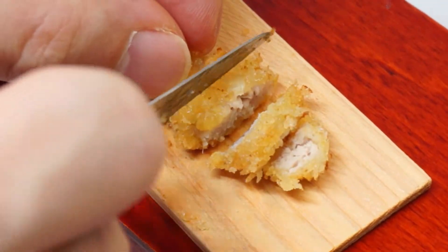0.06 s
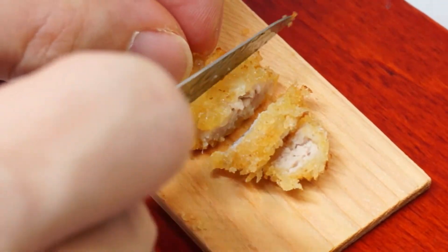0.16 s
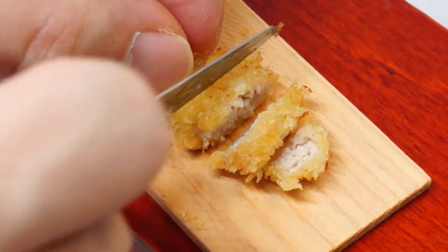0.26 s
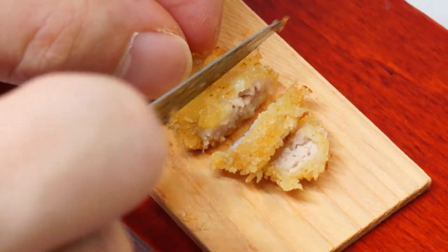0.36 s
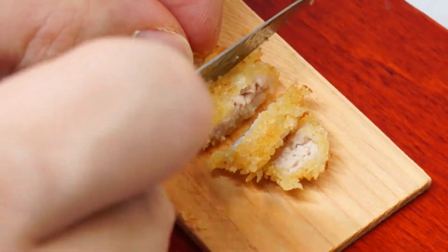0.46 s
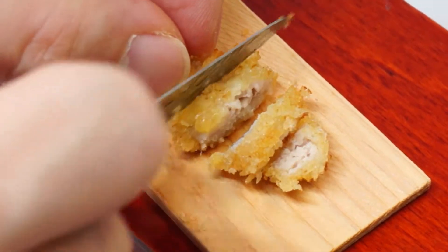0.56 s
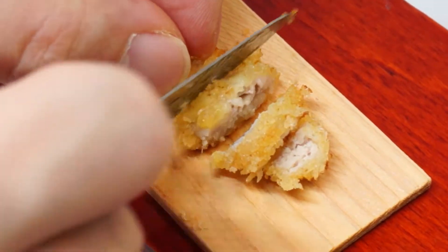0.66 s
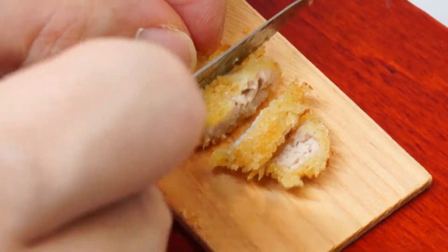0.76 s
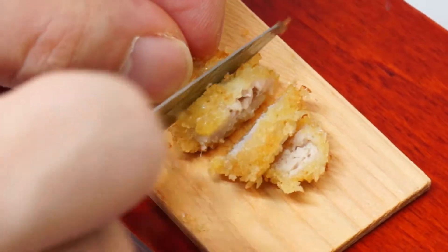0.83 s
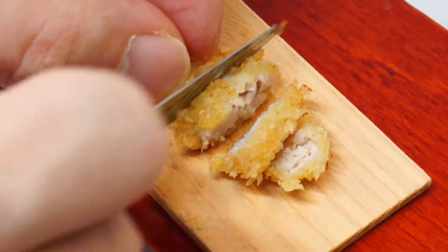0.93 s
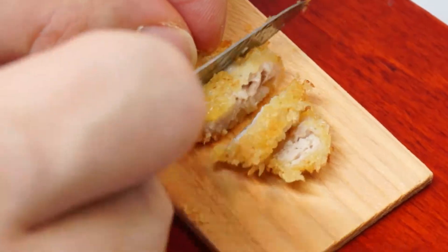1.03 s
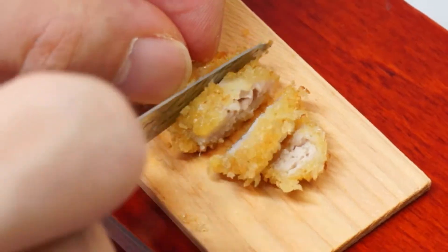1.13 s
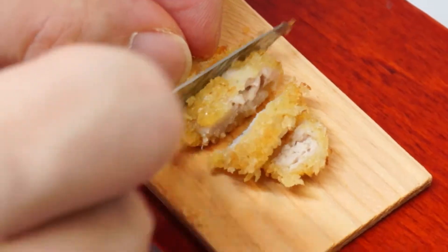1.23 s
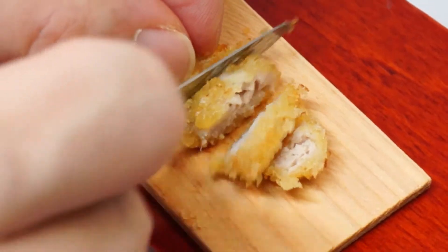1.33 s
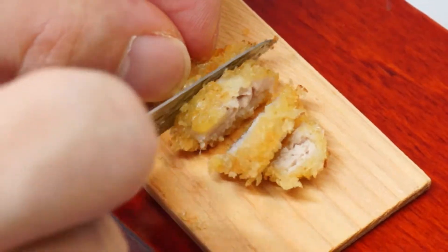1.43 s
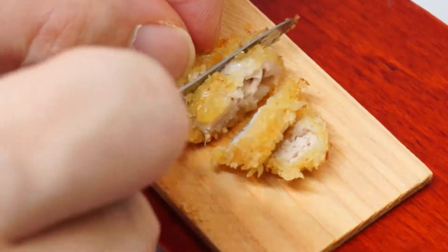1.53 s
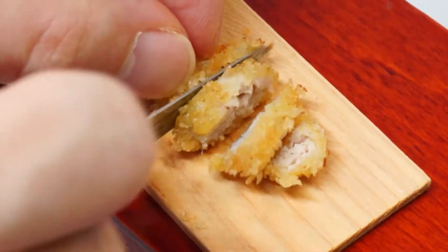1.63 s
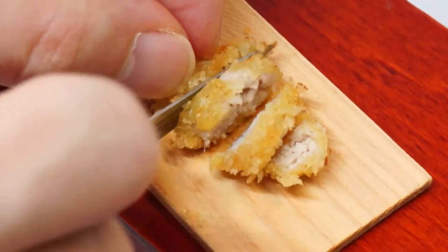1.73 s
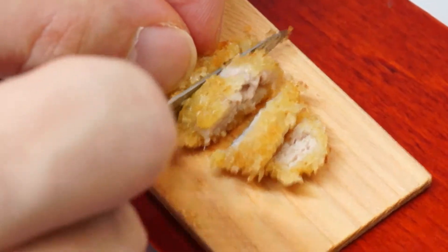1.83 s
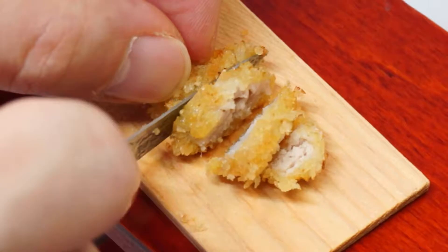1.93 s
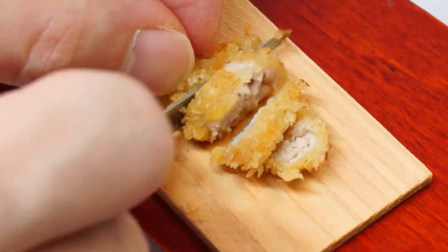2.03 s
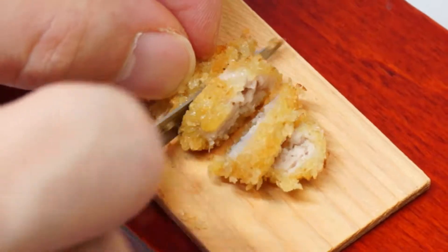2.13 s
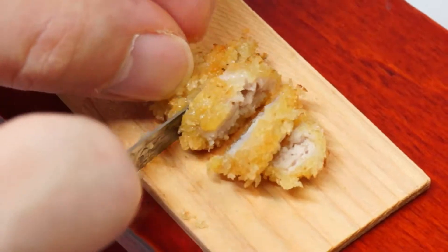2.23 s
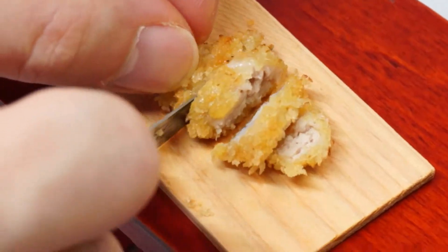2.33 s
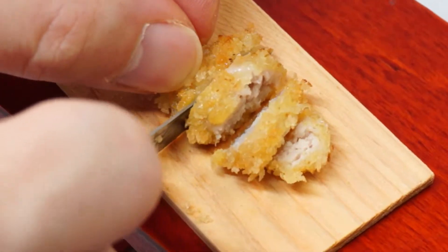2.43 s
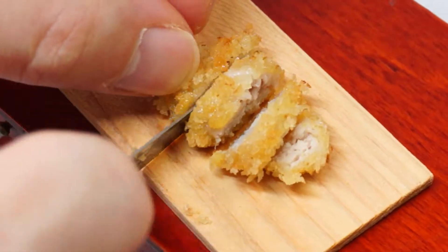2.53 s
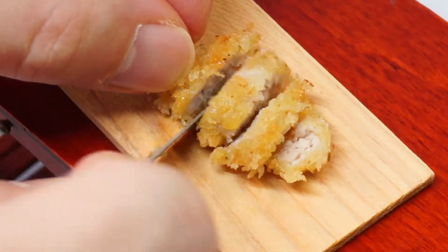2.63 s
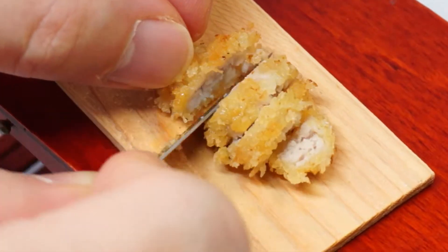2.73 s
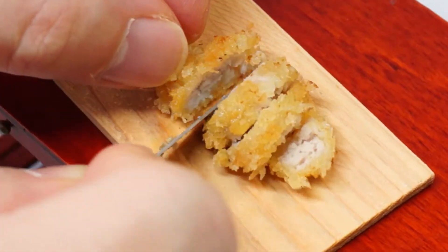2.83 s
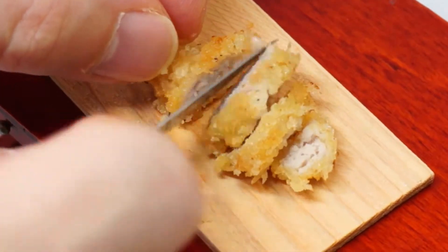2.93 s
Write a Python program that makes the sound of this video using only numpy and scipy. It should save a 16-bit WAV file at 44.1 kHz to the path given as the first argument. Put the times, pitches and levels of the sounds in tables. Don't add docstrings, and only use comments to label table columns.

```python
import sys
import numpy as np
from scipy import signal
from scipy.fft import rfft, irfft
from scipy.io import wavfile
from scipy.ndimage import uniform_filter1d

SR = 44100
rng = np.random.default_rng(int(sys.argv[2]) if len(sys.argv) > 2 else 0)


def generate_wav(sig):
    pcm = np.round(np.clip(np.atleast_2d(sig).T, -1, 1) * 32767).astype(np.int16)
    wavfile.write(sys.argv[1], SR, pcm)


def boost_factor(decibels):
    exponent = np.asarray(decibels, float) / 20
    return 10 ** exponent


N = 132300

# [t/s, peak level/dB, blade ring level/dB re crack]
CRACKS = [(0.084, -27, -30), (0.0917, -29, -23), (0.2537, -28.5, -10), (0.2994, -16.5, -43),
          (0.4094, -29.5, -17), (0.417, -32, -26), (0.4238, -24, -3), (0.4479, -28, -14),
          (0.457, -33, -20), (0.5207, -23.5, -20), (0.527, -21, -19), (0.535, -17, -34),
          (0.559, -29, -12), (0.623, -34, -14), (0.681, -24, -15), (0.6908, -20.5, -20.5),
          (0.715, -27.5, -19), (.768, -34, -20), (0.7795, -19.5, -16.5), (0.819, -19.5, -4.5),
          (0.8939, -33.5, 1.5), (1.0584, -35, -18), (1.0794, -23, -22), (1.0894, -25.5, -7.5),
          (1.122, -27, -20), (1.1613, -23, -12), (1.168, -26, -14), (1.1822, -19.5, -10),
          (1.2462, -31.5, -12), (1.258, -24, -10.5), (1.2655, -43.5, 8),
          (1.3937, -8.5, -14.5), (1.4014, -40, -18), (1.4198, -36.5, 7), (1.491, -29, -14),
              (1.5959, -27, -19), (1.6172, -18.5, -11), (1.6414, -17.5, -18), (1.649, -17.5, -32),
              (1.7, -27, -36), (1.9592, -29.5, -15), (2.0315, -25.5, -22), (2.087, -21, -37),
              (2.1476, -15, -24), (2.165, -24, -10), (2.1707, -22, -19), (2.1812, -24, -12),
              (2.2112, -13.5, -13), (2.2191, -11, -15), (2.2533, -29, -28), (2.2732, -18, -9),
              (2.2881, -18.5, -9), (2.2944, -24, -8), (2.3054, -14.5, -4.5), (2.324, -22.5, -22),
              (2.4126, -23.5, -12.5), (2.4613, -43, -23), (2.7056, -25, -17), (2.7358, -25.5, -11.5),
              (2.7433, -24.5, -11.5), (2.9381, -27, -13),
          (0.0395, -38, -28), (0.145, -40, -21), (.1989, -37, -25), (0.2144, -34, -23),
                (0.753, -32, -18), (.7615, -41, -1), (0.8282, -25.5, -33), (.8869, -31, -17),
                (.9018, -30, -16), (1.047, -41, -6), (1.509, -33, -19), (1.532, -45, -18),
                (1.551, -34.5, -24), (1.5748, -31, -21), (1.7365, -35, -21), (1.838, -37, -18),
                (1.8657, -40.5, -14), (1.942, -37, -12), (2.0068, -33, -16), (2.124, -27, -14),
                (2.1373, -29, -17), (2.1436, -19.5, -17), (2.296, -30.5, -4), (2.315, -24, -18),
                (2.45, -34, -18), (2.5428, -33, -15.5), (2.763, -32, -22), (2.779, -36, -13),
                (2.803, -33.5, -22), (2.9033, -39, -18), (2.9605, -35, -15)]
# [start t/s, length t/s, level/dB]
STROKES = [(0.068, 0.026, -94), (0.2, 0.075, -64), (0.429, 0.13, -58.5), (0.516, 0.064, -57.5),
           (0.682, 0.018, -55.5), (0.762, 0.038, -51), (0.884, 0.066, -63), (1.04, 0.076, -56),
           (1.167, 0.14, -58), (1.338, 0.074, -53), (1.398, 0.066, -56), (1.463, 0.12, -63.5),
           (1.587, 0.069, -55), (1.687, 0.052, -60.5), (1.844, 0.089, -63), (2.069, 0.078, -55),
           (2.126, 0.042, -49.5), (2.23, 0.078, -55.5), (2.255, 0.044, -54), (2.372, 0.16, -60),
           (2.7, 0.061, -54)]
# [f/Hz, level/dB, t60/s]
CRUST_MODES = [(6220, -13, 0.0011), (8330, -7, 0.0023), (9360, -2, 0.0019), (11630, 4.5, 0.0012),
               (13300, 4.5, 0.0012), (14600, 0.5, 0.0031)]
# [f/Hz, level/dB, t60/s]
BLADE_MODES = [(1712, -16.5, 0.044), (2296, -7.5, 0.0072), (2884, -2, 0.0069), (3467, -1.5, 0.013),
               (3920, 0.5, 0.0066), (4473, 0.5, 0.0096), (5730, 1.5, 0.0038)]
# [middle t/s, half length t/s, level/dB]
DRAGS = [
    (0.42, 0.0059, -61),
    (0.819, 0.0076, -54.5),
    (0.898, 0.0078, -53.5),
    (1.182, 0.0062, -55),
    (2.182, .012, -56),
    (2.602, .04, -61.5),
]
# [t/s, peak level/dB]
KNOCKS = [
    (1.103, -23),
    (1.373, -21),
    (1.609, -20.5),
    (1.895, -24),
    (2.154, -27),
    (2.396, -21),
]
# [t/s, level/dB, contact t/ms]
THUMPS = [(0.092, -33.5, 4.6), (.139, -45, 2.2), (0.214, -35, 3), (0.357, -47, 3.6), (0.393, -45, 3),
          (0.434, -35.5, 3.7), (.54, -34, 3.5), (0.791, -31, 3.7), (0.82, -26.5, 3.5), (0.9, -27, 2.4),
          (1.058, -36, 2.7), (1.089, -27, 3.2), (1.126, -47, 1.5), (1.14, -30, 1.3), (1.152, -30, 2),
          (1.179, -22, 2.6), (1.191, -40, 3), (1.4, -24, 5.2), (1.415, -28.5, 2.4), (1.448, -18.5, 3.75),
          (1.636, -33, 3), (1.669, -26.5, 2.9), (1.699, -22, 2.5), (1.941, -27.5, 3.6), (1.966, -22.5, 2.9),
          (2.064, -28, 1.95), (2.203, -30, 3.2), (2.226, -20.5, 3.6), (2.31, -23, 3.9), (2.41, -28.5, 2.56),
          (2.423, -27, 3.1), (2.436, -27, 3.6), (2.551, -31.5, 2.8), (2.622, -31.5, 5.9), (2.702, -36, 3.1),
          (2.778, -34, 3.6), (2.941, -37.5, 0.55)]
# [f/Hz, level/dB, t60/s]
BOARD_MODES = [(137.6, -2, 0.098), (204, -2, 0.035), (304, -6, 0.031), (395, -6.5, 0.049),
               (480.6, -7, 0.04), (555.8, -12, 0.13), (750, -11, 0.053), (873, -7, 0.029),
               (989, -11.5, 0.013), (1160, -11.5, 0.015), (1390, -13.5, 0.017), (1517, -15, 0.018),
               (1760, -11.5, 0.014), (2840, -19.5, 0.011), (3670, -11, 0.017)]
# [f/Hz, width f/Hz]
BOARD_GAPS = [(655, 108), (1950, 170)]
# [f/Hz, width f/Hz, level/dB]
WHINES = [(53, 14, -74), (143.6, 55, -57), (214.6, 15, -66.5), (302.4, 41, -57.5), (416, 21, -84),
          (1660, 27, -72), (3460, 160, -74), (3690, 27, -73.5), (5330, 53, -79.5)]
# [f/Hz, level/dB per Hz]
FLOOR_COLOUR = [(28, -19.5), (55, -1), (80, -12.5), (200, -8), (500, -11.5), (1000, -25), (2100, -33.5),
                (12000, -35.5)]
# [f/Hz, level/dB]
SIDE_COLOUR = [(30, -27), (80, -19), (150, -15.5), (300, -10.5), (700, -3.5), (1500, -3.5), (3000, -4),
               (6000, -11), (9000, -19.5), (12000, -23)]


def impulses(times, dbs):
    x = np.zeros(N)
    np.add.at(x, np.clip((np.asarray(times) * SR).astype(int), 0, N - 1), boost_factor(np.asarray(dbs)))
    return x


def ring(x, modes, flip=1):
    out = 0
    for k, (hz, db, t60) in enumerate(modes):
        pole = np.exp(2j * np.pi * hz / SR - np.log(1000) / (t60 * SR))
        out = out + flip ** k * boost_factor(db) * signal.lfilter([1], [1, -pole], x).imag
    return out


def shaped(points, x):
    f = np.fft.rfftfreq(N, 1 / SR) + 1
    hz, db = np.array(points, float).T
    return irfft(rfft(x) * boost_factor(np.interp(np.log(f), np.log(hz), db)), N)


def at_level(x, db):
    return x * boost_factor(db) / np.sqrt(np.mean(x ** 2))


def walk(rate):
    k = int(SR / rate)
    steps = np.repeat(rng.standard_normal(N // k + 1), k)
    return 1.11 * uniform_filter1d(uniform_filter1d(steps, k), k)[:N]


def push(start_s, db, ms):
    u = (np.arange(N) / SR - start_s) / (ms / 1000)
    shape = np.where((u > 0) & (u < 1), np.sin(np.pi * u) ** 2, 0)
    return boost_factor(db) * shape / max(shape.sum(), 1e-9)


def decay(x, s):
    return signal.lfilter([1], [1, -np.exp(-1 / (s * SR))], x)


def cracks():
    snap_db, snap_lag_s, blade_db = 1.5, 0.001, 2.5
    tail_db, tail_s = -20.5, 0.0018
    rubble_db, rubble_s = -33, 0.013
    times, peak_db, ring_db = np.array(CRACKS).T
    ragged = rng.standard_normal((2, N)) * boost_factor(2.85 * rng.standard_normal((2, N)))
    rubble_gain = boost_factor(rubble_db + 4.9 * walk(400))

    def burst(db, noise):
        snap = impulses(times + snap_lag_s, db + snap_db)
        tail = boost_factor(tail_db) * decay(snap, tail_s)
        rubble = rubble_gain * decay(snap, rubble_s)
        return snap + noise * (tail + rubble)

    crust = ring(burst(peak_db, ragged[0]), CRUST_MODES, flip=-0.71)
    blade = ring(burst(peak_db + ring_db + blade_db, ragged[1]), BLADE_MODES, flip=-0.94)
    return 0.65 * crust + 0.23 * blade


def crumbs():
    breaks_per_s, spread_db = 1600, 3.6
    attack_s, fade_s = 0.0072, 0.032
    t = np.arange(N) / SR
    effort = 0
    for start, length, db in STROKES:
        fade = np.exp(-np.clip(t - start - length, 0, 1) / fade_s)
        effort = effort + boost_factor(db) * np.clip((t - start) / attack_s, 0, 1) * fade
    chance, size, sign = rng.random((3, N))
    grains = (chance < breaks_per_s / SR) * boost_factor(-spread_db * np.log(size + 1e-4)) * np.sign(sign - 0.5)
    dust = 0.13 * rng.standard_normal(N) * decay(np.abs(grains), 0.0028)
    return at_level(grains + dust, 0) * effort * boost_factor(4.0 * walk(60))


def drag():
    t = np.arange(N) / SR
    swell = sum(boost_factor(db) * np.exp(-0.5 * ((t - s) / d) ** 2) for s, d, db in DRAGS)
    friction = rng.standard_normal(N) * boost_factor(7.5 * walk(300))
    return swell * at_level(ring(friction, BLADE_MODES[2:6], flip=-0.84), 0)


def board(bits):
    tick_db, tick_lag_s, tick_ms = -0.5, 0.00125, 0.25
    knock_db, knock_lag_s, knock_ms = 5, 0.00285, 1.36
    scuff_db, scuff_s = -41, 0.031
    crumb_push_db, low_cut_hz = -18.5, 150
    thump_s, thump_db, _ = np.array(THUMPS).T
    stiff_modes = [mode for mode in BOARD_MODES if mode[0] > 700]

    tick = sum(push(s + tick_lag_s, db + tick_db, tick_ms) for s, db in KNOCKS)
    scuff_swell = uniform_filter1d(decay(impulses(thump_s, thump_db), scuff_s), size=400)
    scuff = boost_factor(scuff_db) * rng.standard_normal(N) * scuff_swell

    knock = sum(push(s + knock_lag_s, db + knock_db, knock_ms) for s, db in KNOCKS)
    rocking = sum(push(*row) for row in THUMPS)
    shaking = boost_factor(crumb_push_db) * uniform_filter1d(bits, size=30)

    body = ring(knock + rocking + shaking, BOARD_MODES)
    body = body + ring(tick + uniform_filter1d(scuff, size=10), stiff_modes)
    for hz, width_hz in BOARD_GAPS:
        body = signal.lfilter(*signal.iirnotch(hz, hz / width_hz, fs=SR), body)
    return signal.sosfilt(signal.butter(4, low_cut_hz, "high", fs=SR, output="sos"), body)


def rub():
    middle_s, length_s, level_db = 0.95, 0.022, -55
    skin = [(12100, 0, 0.0006)]  # f/Hz, level/dB, t60/s
    swell = np.exp(-0.5 * ((np.arange(N) / SR - middle_s) / length_s) ** 2)
    hiss = ring(ring(rng.standard_normal(N), skin), skin)
    return swell * at_level(hiss, level_db)


def room_tail(dry):
    level_db, t60_s, dull_hz = -5, 0.32, 2550
    t = np.arange(SR // 2) / SR
    tails = rng.standard_normal((2, len(t))) * boost_factor(-60 * t / t60_s) * (t > 0.003)
    tails = tails / np.sqrt((tails ** 2).sum(1, keepdims=True))
    tails = signal.lfilter(*signal.butter(1, dull_hz, fs=SR), tails)
    return boost_factor(level_db) * signal.fftconvolve(dry[None], tails, axes=1)[:, :N]


def room_tone():
    hum_hz, hum_db, wobble_db, floor_db = 441.1, -46, 0.56, -51
    hum_phase = 2 * np.pi * np.cumsum(hum_hz + 0.53 * walk(5.94)) / SR
    hum = np.sqrt(2) * boost_factor(hum_db + wobble_db * walk(8.7)) * np.sin(hum_phase)
    f = np.fft.rfftfreq(N, 1 / SR)

    def background():
        air = at_level(shaped(FLOOR_COLOUR, rng.standard_normal(N)), floor_db) * boost_factor(walk(2.97))
        for hz, width_hz, db in WHINES:
            peak = 1 / (1 + ((f - hz) / width_hz * 2) ** 2)
            air = air + at_level(irfft(rfft(rng.standard_normal(N)) * peak, N), db)
        return air

    hum_side = boost_factor(-14.5) * np.gradient(hum) * SR / (2 * np.pi * hum_hz)
    return background() + hum, shaped(SIDE_COLOUR, background()) + hum_side


def scene():
    bits = crumbs()
    wood = board(bits)
    crumbling = 0.56 * ring(bits, CRUST_MODES, flip=-0.76)
    crumbling = crumbling + 0.23 * boost_factor(-8) * ring(bits, BLADE_MODES, flip=-0.89)
    crisp = cracks() + rub() + drag() + crumbling
    near = wood + crisp
    wet_mid, wet_side = room_tail(crisp + boost_factor(-1) * wood)
    near_side = 0.5 * signal.hilbert(near).imag - 0.17 * wood
    mid, side = room_tone()
    mid = mid + near + wet_mid
    side = side + shaped(SIDE_COLOUR, boost_factor(-1) * wet_side + near_side)
    return np.array([mid + side, mid - side])


def roll_off(x):
    return signal.sosfilt(signal.butter(12, 16970, fs=SR, output="sos"), x)


def record(dry):
    top_cut = signal.ellip(6, 0.5, 38, 15650, fs=SR, output="sos")
    return roll_off(signal.sosfilt(top_cut, dry))


dry = scene()
out = record(dry)
generate_wav(out)
```